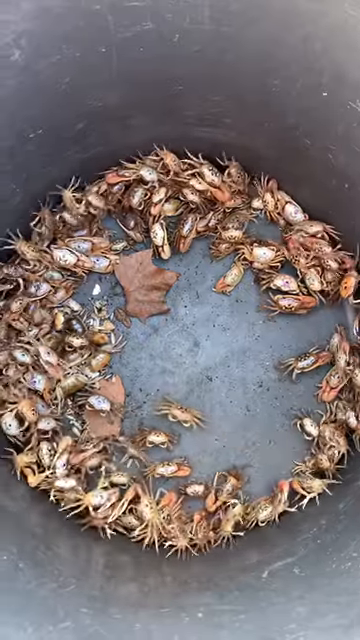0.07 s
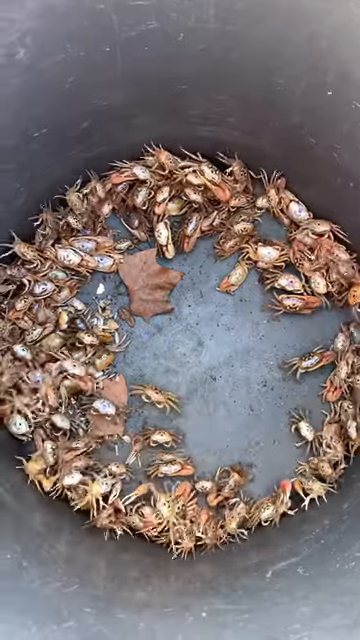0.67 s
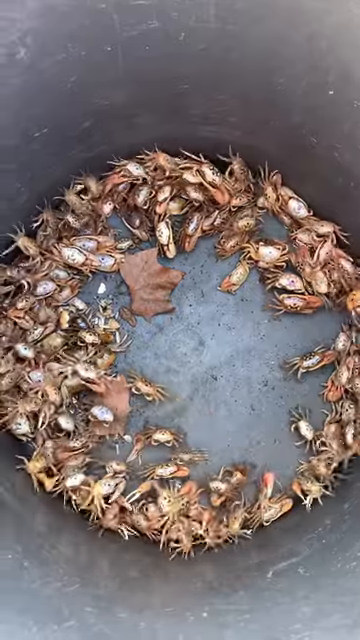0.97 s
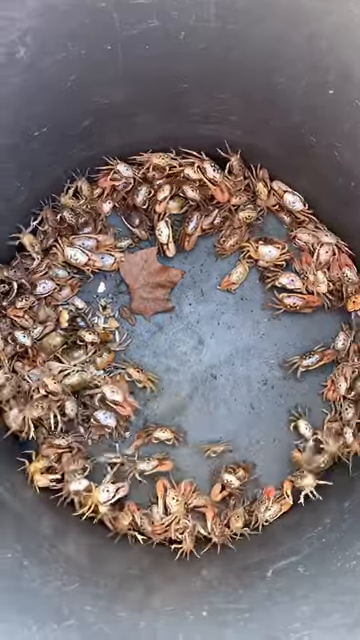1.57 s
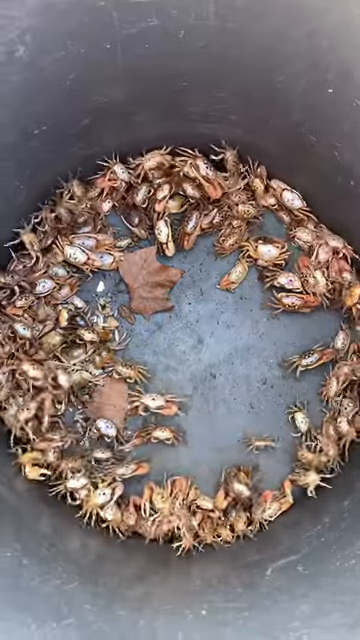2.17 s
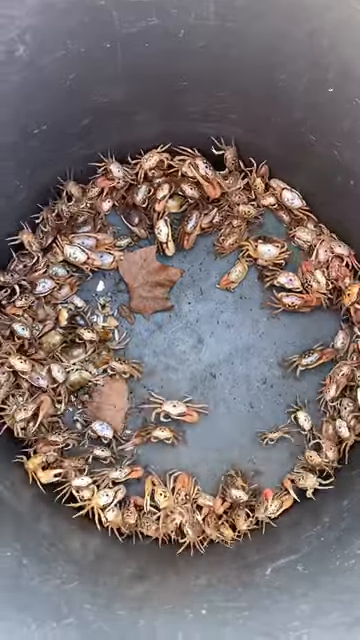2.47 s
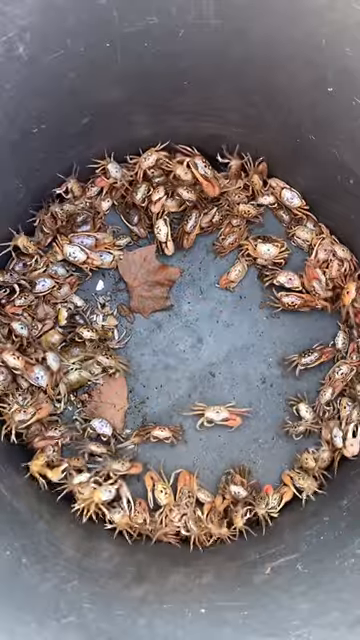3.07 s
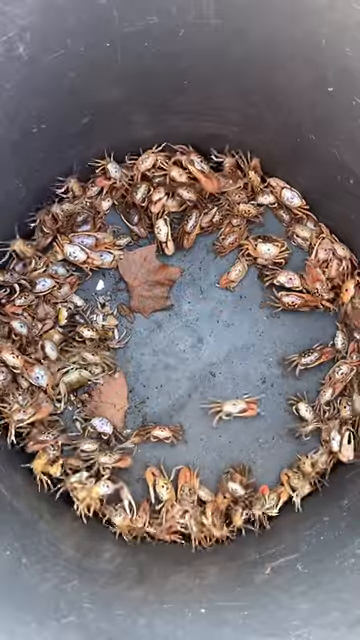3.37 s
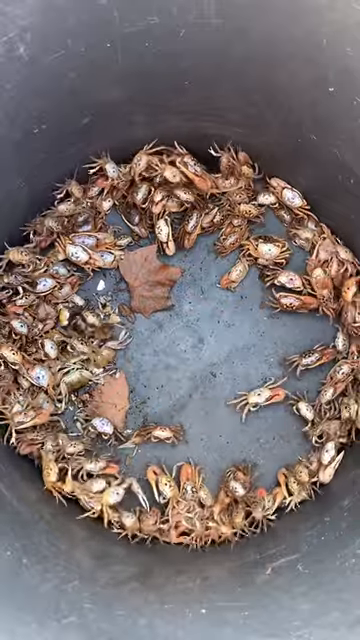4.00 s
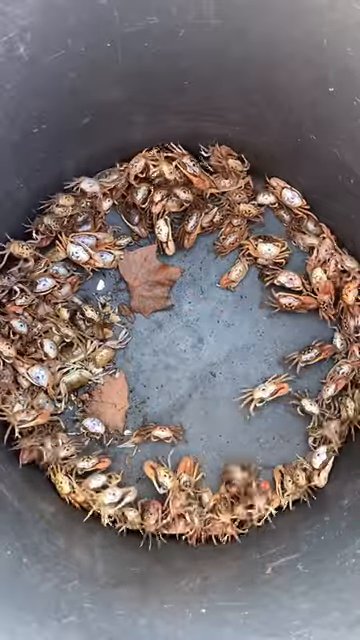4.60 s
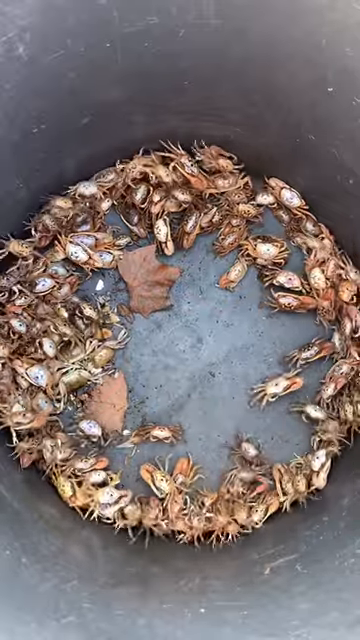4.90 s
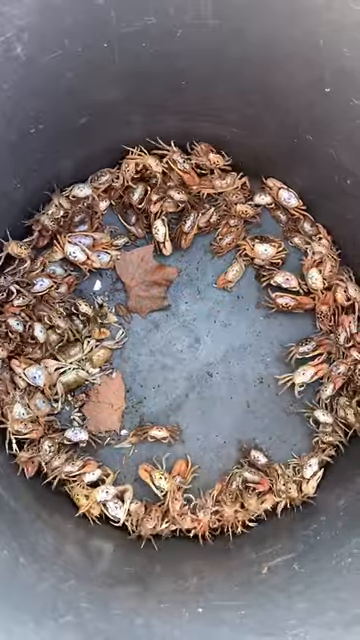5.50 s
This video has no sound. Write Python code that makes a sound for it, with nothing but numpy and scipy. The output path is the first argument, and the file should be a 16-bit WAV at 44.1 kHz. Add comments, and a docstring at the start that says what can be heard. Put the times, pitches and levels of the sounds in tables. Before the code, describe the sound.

Wind rumbles and thumps in uneven gusts on a microphone held over a plastic bucket outdoors. Underneath, many small crabs crawl over each other, their legs and shells making a fine, continuous rustle. Claws click now and then, most clearly a little after one second, with a few light taps on the bucket wall and two tiny squeaks. A steady, slightly hollow hush lies behind it all.

```python
"""Uneven gusts rumble and buffet on a microphone held over a plastic bucket of small crabs outdoors.
The crabs crawl over each other: legs and shells make a fine rustle, and now and then a claw
clicks, a shell squeaks on the plastic or a tap rings the wall.
Behind them the outdoor hush hums in the air resonances of the bucket."""
import sys
import numpy as np
from scipy import signal
from scipy.fft import rfft, irfft
from scipy.io import wavfile
from scipy.ndimage import uniform_filter1d

SR = 44100
rng = np.random.default_rng(int(sys.argv[2]) if len(sys.argv) > 2 else 0)


def inscribe(sig):
    """Save sig as 16-bit PCM at rate SR to the path in sys.argv[1].

    A 1-D sig is mono; a 2-D sig holds one channel per row.
    Samples are clipped to [-1, 1] before scaling.
    """
    pcm = np.round(np.clip(np.atleast_2d(sig).T, -1, 1) * 32767)
    wavfile.write(sys.argv[1], SR, pcm.astype(np.int16))


N = 249165
TIME_S = np.arange(N) / SR
FREQ_HZ = np.maximum(np.fft.rfftfreq(N, 1 / SR), 1)
SIDE = np.array([[1], [-1]])   # left, right


def from_db(db):
    """Decibels to gain."""
    return 10 ** (np.asarray(db) / 20)


def unit_rms(x):
    """Scale to rms 1."""
    return x / np.sqrt(np.mean(x ** 2) + 1e-20)


def over_time(points):
    """Join (s, value) points at every sample."""
    return np.interp(TIME_S, *np.transpose(points))


def over_hz(points):
    """Join (Hz, value) points on a log-frequency axis."""
    hz, value = np.transpose(points)
    return np.interp(np.log(FREQ_HZ), np.log(hz), value)


def peaks_db(resonances):
    """Spectrum of a few resonances."""
    return sum(db / (1 + (2 * (FREQ_HZ - hz) / width_hz) ** 2) for hz, width_hz, db in resonances)


def colour(x, spectrum_db):
    """Give a steady signal a spectrum; rms 1."""
    return unit_rms(irfft(rfft(x) * from_db(spectrum_db), N))


def drift(rate_hz):
    """Random wander, mostly below rate_hz; rms 1."""
    return colour(rng.standard_normal(N), -40 * np.log10(np.hypot(1, FREQ_HZ / rate_hz)))


def band(x, low_hz, high_hz):
    """Causal band-pass."""
    edges_hz = [np.clip(low_hz, 10, .4 * SR), np.clip(high_hz, 20, .45 * SR)]
    return signal.sosfilt(signal.butter(2, edges_hz, "band", fs=SR, output="sos"), x)


# Gusts. Each row: start in seconds, hold in seconds, relative level in dB, fall in dB per second.
GUST_EVENTS = [(0.0, 0.17, -28, 46), (0.474, 0.27, -30, 69), (1.034, 0.15, -33.5, 191),
               (1.26, 0.033, -43.5, 250), (1.36, 0.026, -34.5, 360), (1.514, 0.013, -35.5, 245),
               (1.778, 0.25, -31, 457), (2.312, 0.48, -29.5, 105), (3.295, 0.11, -30, 165),
               (3.536, 0.069, -37, 120), (3.712, 0.18, -33.5, 399), (3.972, 0.066, -32.5, 150),
               (4.183, 0.043, -25, 111), (4.512, 0.086, -28.5, 201), (4.719, 0.11, -37, 396),
               (4.977, 0.014, -38.5, 59), (5.359, 0.095, -27.5, 172), (5.55, 0.13, -24, 100)]

def gust_db(calm_db=-55, rise_db_per_s=392):
    """Each gust builds fast, holds and dies away; their powers add to that of the calm air."""
    power = from_db(calm_db) ** 2
    for start_s, hold_s, db, fall_db_per_s in GUST_EVENTS:
        before_s = np.maximum(start_s - TIME_S, 0)
        after_s = np.maximum(TIME_S - start_s - hold_s, 0)
        power += from_db(db - rise_db_per_s * before_s - fall_db_per_s * after_s) ** 2
    return 10 * np.log10(power)


# Turbulence. Each row: frequency in Hz, relative density in dB.
RUMBLE_SPECTRUM = [(18, -52), (30, -43), (48, 2.5), (70, 3), (105, -4), (160, -13.5), (240, -20),
                   (350, -32), (520, -41.5), (900, -85), (2000, -109)]

def rumble(level_db, fine_above_hz=140, flurry_db=4.5):
    """Lumpy turbulence on the microphone follows the gusts; its finer swirls come in flurries."""
    common, apart = colour(rng.standard_normal((2, N)), over_hz(RUMBLE_SPECTRUM))
    local_rms = np.sqrt(uniform_filter1d(common ** 2, int(.045 * SR)) + 1e-9)
    flow = common / local_rms + .14 * apart * SIDE   # nearly alike at both ports
    fine = irfft(rfft(flow) / (1 + (fine_above_hz / FREQ_HZ) ** 6), N)
    flurries = from_db(flurry_db * np.tanh(drift(rate_hz=14)))
    lumps_db = 2.6 * np.tanh(drift(rate_hz=35))
    return (flow - fine + fine * flurries) * from_db(gust_db() + level_db + lumps_db)


# One eddy. Each row: multiple of its centre frequency, relative density in dB.
EDDY_SPECTRUM = [(.1, -28), (.35, -10.5), (.6, -2), (.9, 2.5), (1.3, -2.5), (1.8, -12.5), (2.7, -22),
                 (3.8, -35), (6, -86)]

def eddy(middle_s, centre_hz, length_s, top_hz=1630, slowing_cycles=.75):
    """A few dull, uneven pressure swings, fast at first and then slower."""
    size = 2 * (SR // 8)
    t = (np.arange(size) - size // 2) / SR
    hz = np.maximum(np.fft.rfftfreq(size, 1 / SR), 1)
    ratio = hz / centre_hz
    skew = np.where(t < 0, .75, 1.126)   # arrives faster than it leaves
    swell = np.exp(-2 * (t / length_s / skew) ** 2)
    phase = np.angle(rfft(rng.standard_normal(size) * swell))
    toneless = irfft(np.exp(1j * phase)) * np.sqrt(swell)
    multiple, density_db = np.transpose(EDDY_SPECTRUM)
    shape = from_db(np.interp(np.log(ratio), np.log(multiple), density_db)) / (1 + (hz / top_hz) ** 8)
    lows_late = np.exp(-2j * np.pi * slowing_cycles * (np.log(ratio) - ratio))
    puff = irfft(rfft(toneless) * shape * lows_late)
    puff *= np.sqrt(np.sum(swell ** 2) / np.sum(puff ** 2))
    return np.interp(TIME_S - middle_s, t, puff, left=0, right=0)


# Eddy hits. Each row: middle in seconds, relative level in dB, centre in Hz, length in seconds,
# relative level of the wake in dB.
EDDY_HITS = [(0.008, -12.5, 82, 0.0094, -33), (0.158, -35, 187, 0.017, -32),
             (0.222, -24.5, 234, 0.0084, -38), (0.259, -22.5, 231, 0.012, -26.5),
             (0.274, -16, 314, 0.0037, -25), (0.316, -31.5, 185, 0.0093, -27),
             (0.458, -24.5, 181, 0.036, -48), (0.51, -31, 158, 0.01, -21), (0.575, -11, 142, 0.0054, -28),
             (0.595, -17, 175, 0.018, -23.5), (0.66, -23, 187, 0.012, -22),
             (0.682, -21, 417, 0.0043, -14.5), (0.767, -31, 165, 0.0036, -25),
             (1.141, -23, 176, 0.0099, -19.5), (1.388, -36.5, 203, 0.0065, -34),
             (1.83, -16, 87.6, 0.015, -32), (1.875, -21, 142, 0.011, -31), (2.271, -27, 430, 0.0065, -41),
             (2.282, -31.5, 494, 0.0079, -39), (2.285, -12.5, 130, 0.012, -11),
             (2.396, -21.5, 172, 0.012, -15.5), (2.413, -21, 370, 0.0047, -15.5),
             (2.449, -22, 224, .005, -29), (2.469, -20.5, 214, 0.015, -34), (2.476, -27.5, 640, 0.007, -33),
             (2.521, -13, 70, 0.011, -22.5), (2.541, -22, 310, 0.0068, -19),
             (2.59, -20, 460, 0.0067, -15.5), (2.595, -31, 890, 0.0054, -32),
             (2.605, -14, 283, 0.0086, -26), (2.762, -19.5, 120, 0.011, -29),
             (3.27, -29, 243, 0.0089, -15.5), (3.328, -30, 187, 0.011, -23),
             (3.363, -25.5, 168, 0.013, -22), (3.402, -24.5, 335, 0.011, -34),
             (3.42, -22.5, 217, 0.017, -33), (3.515, -9, 95, 0.0116, -20), (3.578, -33.5, 162, 0.0084, -37),
             (3.758, -25.5, 172, 0.0097, -28), (3.823, -28, 161, 0.029, -32),
             (4.083, -11, 237, 0.0039, -17), (4.184, -20, 268, 0.0028, -26),
             (4.245, -27, 89.5, 0.0065, -29), (4.286, -30, 197, 0.0092, -28), (4.592, -28, 192, 0.057, -45),
             (4.964, -21.5, 94, 0.011, -34), (5.525, -22, 296, 0.006, -16.5), (5.577, -28, 157, 0.018, -40),
             (5.611, -21, 176, 0.0091, -19), (5.633, -19, 224, 0.023, -4)]

def buffets(level_db, wake_lag_s=.0139):
    """Eddies hit the microphone, each followed by the low thump of its wake."""
    out = np.zeros(N)
    for middle_s, db, centre_hz, length_s, wake_db in EDDY_HITS:
        out += from_db(db + level_db) * eddy(middle_s, centre_hz, length_s)
        out += from_db(wake_db + level_db) * eddy(middle_s + wake_lag_s, centre_hz=86.5, length_s=.019)
    return out


# Wind balance. Each row: frequency in Hz, right minus left in dB.
WIND_RIGHT_DB = [(40, 0), (130, 1.2), (280, .6), (420, 3.5), (600, 6.5), (1200, 6)]
# Wind arrival. Each row: frequency in Hz, lead of the right port in radians.
WIND_RIGHT_LEAD_RAD = [(20, .2), (55, .37), (100, .5), (160, .72), (240, .9), (430, 1), (600, 1.15),
                       (1200, 1)]

def wind(low_cut_hz=36):
    """Wind from the right is earlier and stronger there; the microphone loses its deepest rumble."""
    flow = rumble(level_db=3.0) + buffets(level_db=-.04)
    flow = signal.sosfilt(signal.butter(3, low_cut_hz, "high", fs=SR, output="sos"), flow)
    soft_ends = signal.windows.tukey(N, .003)
    balance = from_db(-SIDE * over_hz(WIND_RIGHT_DB) / 2)
    lead = np.exp(-SIDE * .5j * over_hz(WIND_RIGHT_LEAD_RAD))
    return irfft(rfft(flow * soft_ends) * balance * lead, N)


# Legs and shells. Each row: frequency in Hz, relative density in dB.
RUSTLE_SPECTRUM = [(900, 24), (2000, 21), (4500, 15.5), (6600, 12.5), (7800, 4), (10000, 8.5), (12200, 9.5),
                   (14500, -2), (16000, -4)]
# Crab activity. Each row: time in seconds, relative level in dB.
RUSTLE_LEVELS = [(0.08, -59), (0.25, -56.5), (0.4, -56.5), (0.58, -59.5), (0.8, -58), (0.95, -59),
                 (1.13, -56.5), (1.25, -57), (1.42, -59.5), (1.63, -58), (1.73, -61.5), (1.87, -54.5),
                 (2.17, -59), (2.27, -59.5), (2.45, -59), (2.75, -59), (2.83, -59.5), (2.9, -56.5),
                 (2.98, -64), (3.05, -59), (3.15, -63.5), (3.28, -61.5), (3.4, -63), (3.47, -59.5),
                 (3.6, -64.5), (3.7, -56), (3.8, -61), (4.0, -58), (4.12, -62.5), (4.3, -61.5),
                 (4.45, -54.5), (4.6, -59), (4.83, -58.5), (4.92, -64), (5.15, -61), (5.3, -65),
                 (5.45, -58.5), (5.6, -61)]

def rustle(level_db, band_ticks_per_s=420, size_db=4.4, t60_s=.026, scrape_power=.45):
    """Leg tips tick and scrape at random, a fine crackle; shells of each size have their own band."""
    edges_hz = np.geomspace(2000, 16500, 6)
    power_decay = from_db(-120 / (t60_s * SR))
    grains = np.zeros((2, N))
    for low_hz, high_hz in zip(edges_hz, edges_hz[1:]):
        onsets = rng.random(N) < band_ticks_per_s / SR
        ticks = onsets * from_db(size_db * np.minimum(rng.exponential(1, N), 3))
        power = signal.lfilter([1], [1, -power_decay], ticks ** 2 + 1e-18)
        envelope = np.sqrt(power / power.mean() + scrape_power)
        grains += band(rng.standard_normal((2, N)), low_hz, high_hz) * envelope
    crackle = colour(grains, over_hz(RUSTLE_SPECTRUM))
    return mic_ports(*crackle) * from_db(over_time(RUSTLE_LEVELS) + level_db)


# Claw and shell contacts. Each row: start in seconds, relative level in dB, centre in Hz,
# rise in seconds, t60 in seconds.
CLICK_EVENTS = [(0.018, -45, 6660, 0.0024, 0.14), (0.488, -50, 8000, .002, .06),
                (0.706, -43, 8000, .006, 0.13), (0.711, -43, 8800, .001, .06),
                (0.721, -44, 8000, .001, 0.06), (0.733, -31, 11800, .0003, 0.006),
                (0.751, -45, 11000, .001, .05), (0.875, -40, 10500, .0005, 0.024),
                (0.8875, -55, 7500, .0003, 0.013), (1.192, -29.5, 3400, .0005, 0.025),
                (1.193, -27.5, 7000, 0.0015, 0.031), (1.1984, -32, 6950, 0.00037, 0.033),
                (1.2052, -44, 7800, .0003, .025), (1.2349, -30, 8200, 0.00054, 0.011),
                (1.240, -45, 8000, .0003, .025), (1.296, -31.5, 5340, 0.0014, 0.032),
                (1.296, -36, 9000, 0.0012, 0.043), (1.337, -43, 7650, .0007, 0.036),
                (1.667, -43, 11000, .003, .04), (1.9108, -36, 12800, .0003, 0.0075),
                (2.030, -50, 10000, .002, .03), (3.230, -47, 11000, .002, .04),
                (3.308, -49, 8800, .0003, 0.013), (3.462, -47.5, 8500, .002, 0.04),
                (3.70, -49, 7360, .003, 0.12), (3.714, -43.5, 8500, .001, .04),
                (4.025, -50, 8000, .001, .025), (4.234, -48, 7100, .001, 0.028),
                (4.411, -43, 6360, .004, 0.07), (4.462, -46, 12000, .001, .04),
                (4.619, -49, 7500, .0005, .02), (5.442, -47, 6400, .002, .06)]
# The ring of a claw. Each row: frequency in Hz, width in Hz, gain in dB.
CLAW_RESONANCES = [(3450, 190, 11), (6950, 1700, 3), (14200, 570, -2)]

def clicks(level_db, band_ratio=1.62, tail_db=-18, tail_t60_s=.2):
    """A contact snaps or, glancing, swells, in a band set by shell size; it flutters between the walls."""
    out = np.zeros((2, N))
    t = np.arange(SR // 4) / SR
    snap = 1 + .8 * np.exp(-t / .0015)
    for start_s, db, centre_hz, rise_s, t60_s in CLICK_EVENTS:
        fade = snap * from_db(-60 * t / t60_s) + from_db(tail_db - 60 * t / tail_t60_s)
        echoes = rng.standard_normal((2, len(t))) * (rng.random(len(t)) < .3)
        flutter = unit_rms(band(echoes, centre_hz / band_ratio, centre_hz * band_ratio))
        crack = flutter * fade * (1 - np.exp(-t / rise_s))
        at = int(start_s * SR)
        out[:, at:at + len(t)] += from_db(db + level_db) * crack[:, :N - at]
    return mic_ports(*irfft(rfft(out) * from_db(peaks_db(CLAW_RESONANCES)), N))


# Claws on the wall. Each row: start in seconds, relative level in dB, upper band edge in Hz.
TAP_EVENTS = [(0.224, -53.5, 1800), (0.400, -63, 2510), (1.193, -62, 2600), (2.02, -56.5, 2070),
              (2.546, -61.5, 2000), (3.413, -62, 3000), (4.091, -62, 1960), (4.235, -53, 4500),
              (4.242, -56, 3020), (4.609, -59.5, 2960), (4.845, -61, 4200), (5.543, -57, 3640)]
# The plastic wall. Each row: frequency in Hz, relative level in dB, t60 in seconds.
WALL_MODES = [(1410, -18, 0.03), (1710, 12, 0.063), (1872, 7, 0.079), (2030, -3, 0.045), (2210, 9, 0.054),
              (2430, -5, 0.02), (2940, -2, 0.027), (3510, 8.5, 0.081), (3670, -10, 0.059),
              (4030, 12, 0.016)]

def taps(level_db, scrape_db=14.0, scrape_t60_s=.078, scatter_db=3):
    """A claw lands with a short scrape and rings the wall's modes; some taps are dull, others bright."""
    out = np.zeros((2, N))
    t = np.arange(SR // 4) / SR
    hz, mode_db, t60_s = np.transpose(WALL_MODES)[:, :, None]
    landing = 1 - np.exp(-t / .002)
    for start_s, db, top_hz in TAP_EVENTS:
        phase = rng.uniform(0, 2 * np.pi, (2, *hz.shape))
        struck_db = mode_db + scatter_db * rng.uniform(-1, 1, hz.shape)   # each spot favours other modes
        ring = np.sum(from_db(struck_db - 60 * t / t60_s) * np.sin(2 * np.pi * hz * t + phase), axis=1)
        scrape = unit_rms(band(rng.standard_normal((2, len(t))), low_hz=1280, high_hz=4650))
        scrape *= from_db(scrape_db - 60 * t / scrape_t60_s)
        tap = band((ring + scrape) * landing, low_hz=860, high_hz=top_hz)
        at = int(start_s * SR)
        out[:, at:at + len(t)] += from_db(db + level_db) * tap[:, :N - at]
    return mic_ports(*out)


# Shell squeaks. Each row: middle in seconds, relative level in dB, pitch in Hz, length in seconds,
# octave gain in dB, waver as a share of the pitch.
SQUEAK_EVENTS = [(1.753, -59, 3310, 0.0081, 6, 0.055), (1.78, -47.5, 3440, 0.026, -5.5, 0.063),
                 (3.065, -45, 2820, 0.01, -17, .022), (3.066, -49.5, 3180, 0.014, -13, .022)]

def squeaks():
    """A shell rubs the plastic: a brief, scratchy tone with its octave."""
    out = np.zeros(N)
    for middle_s, db, hz, length_s, octave_db, waver in SQUEAK_EVENTS:
        phase = 2 * np.pi * np.cumsum(hz * (1 + waver * drift(rate_hz=990))) / SR
        swell = np.exp(-2 * ((TIME_S - middle_s) / length_s) ** 2)
        grip = from_db(6.2 * drift(rate_hz=260))
        out += from_db(db) * swell * grip * (np.sin(phase) + from_db(octave_db) * np.sin(2 * phase))
    return mic_ports(out, np.zeros(N))


# Outdoor hush. Each row: frequency in Hz, relative density in dB.
HUSH_SPECTRUM = [(25, 8), (60, 9), (120, 5), (250, -3), (450, -0.2), (620, -16), (950, -13.5),
                 (1500, -12.5), (2400, -19), (5000, -26), (16000, -50)]
# Air in the bucket. Each row: frequency in Hz, width in Hz, gain in dB.
AIR_RESONANCES = [(180.4, 30.6, 9), (311, 42, 5.5), (382, 170, 2.5), (551, 15, 5), (711, 90, 6.5),
                  (889, 20, 4.5), (976, 130, -10), (1021, 24, 7), (1780, 155, 4), (3470, 60, 7)]
# Swell of the hush. Each row: time in seconds, relative level in dB.
HUSH_LEVELS = [(0.05, -53.5), (1.18, -54.5), (1.6, -55.5), (1.95, -54.5), (2.61, -54.5), (3.1, -55.5),
               (4.5, -54), (5.6, -52.5)]

def hush(level_db):
    """Distant outdoor noise, coloured by the air in the bucket."""
    air = colour(rng.standard_normal((2, N)), over_hz(HUSH_SPECTRUM) + peaks_db(AIR_RESONANCES))
    return mic_ports(*air) * from_db(over_time(HUSH_LEVELS) + level_db)


# Port likeness. Each row: frequency in Hz, coherence from 0 to 1.
PORT_COHERENCE = [(30, .9), (120, .75), (250, .6), (450, .7), (800, .25), (1500, .6), (2500, .5),
                  (3500, .75), (4500, .98), (15000, .96)]
# Port lag. Each row: frequency in Hz, lead of the left port in radians.
PORT_LEFT_LEAD_RAD = [(30, 0), (400, -.2), (700, -.4), (1300, .2), (2400, 1.5), (3400, 1.5), (4000, 2.3),
                      (4700, 3.14), (6900, 6.3), (8950, 9.4), (11000, 12.5), (13150, 15.7), (15000, 18.7)]
# Port balance. Each row: frequency in Hz, left minus right in dB.
PORT_LEFT_DB = [(30, 1.5), (450, -0.5), (780, -3), (1100, -3), (2000, -1.5), (3000, -1), (4000, 0),
                (15000, 0)]

def mic_ports(common, apart):
    """Sound from the bucket reaches two spaced microphone ports with a lag, and partly unlike."""
    alike = over_hz(PORT_COHERENCE)
    pair = np.sqrt((1 + alike) / 2) * rfft(common) + SIDE * np.sqrt((1 - alike) / 2) * rfft(apart)
    lead = np.exp(SIDE * .5j * over_hz(PORT_LEFT_LEAD_RAD))
    balance = from_db(SIDE * over_hz(PORT_LEFT_DB) / 2)
    return irfft(pair * lead * balance, N)


def scene():
    """Wind over the bucket of crabs."""
    crabs = rustle(level_db=1.0) + squeaks() + clicks(level_db=-7.0) + taps(level_db=5.5)
    return wind() + crabs + hush(level_db=14.5)


def record(dry, cutoff_hz=15900):
    """A steep low-pass cuts the top."""
    return signal.sosfilt(signal.ellip(10, .1, 90, cutoff_hz, fs=SR, output="sos"), dry)


dry = scene()
out = record(dry)
inscribe(out)
```